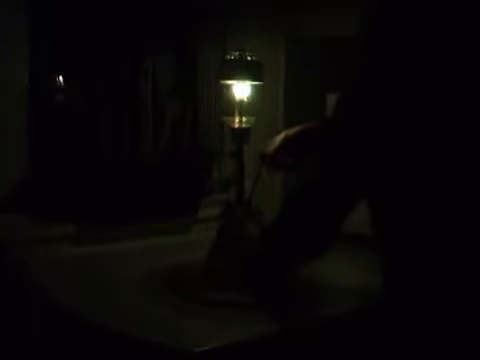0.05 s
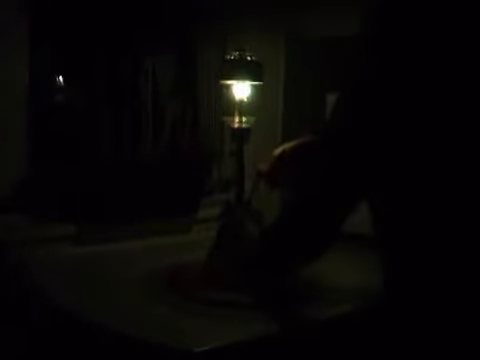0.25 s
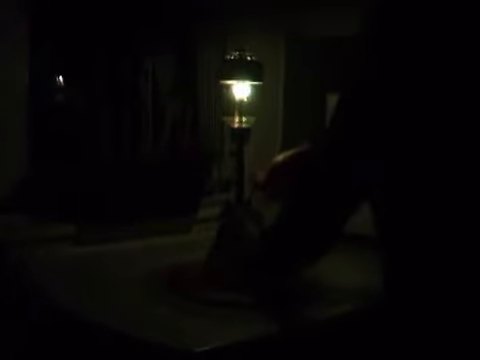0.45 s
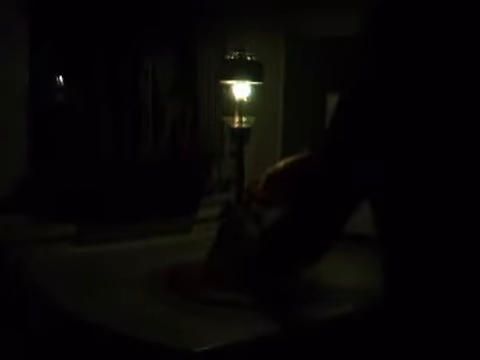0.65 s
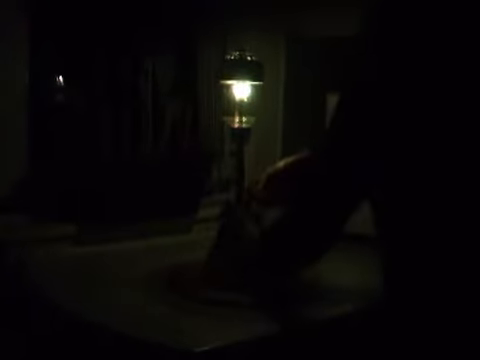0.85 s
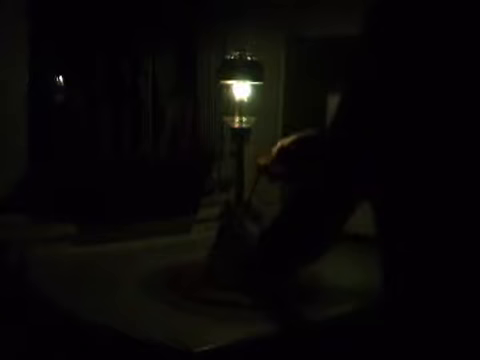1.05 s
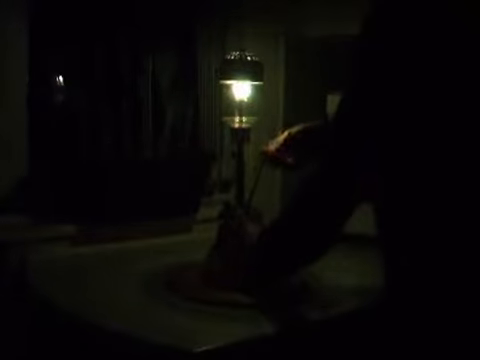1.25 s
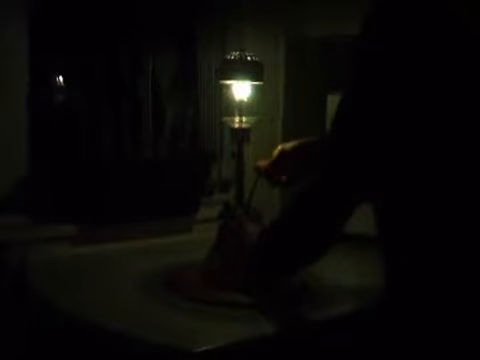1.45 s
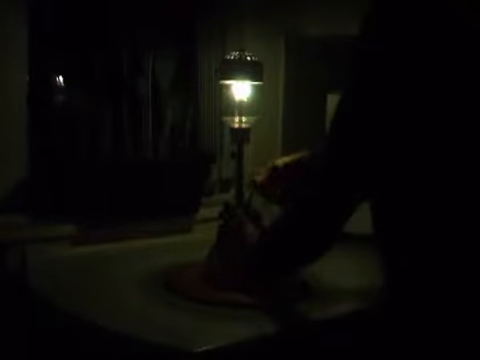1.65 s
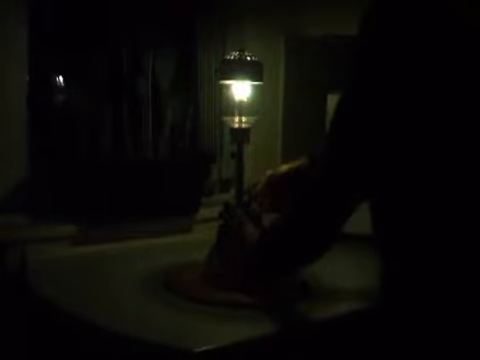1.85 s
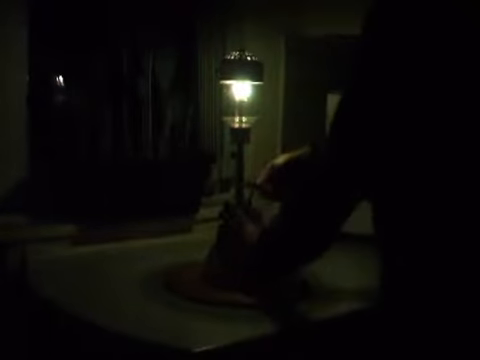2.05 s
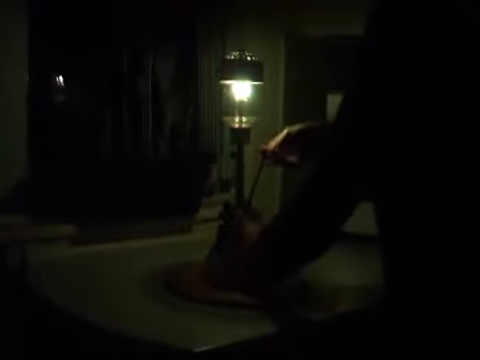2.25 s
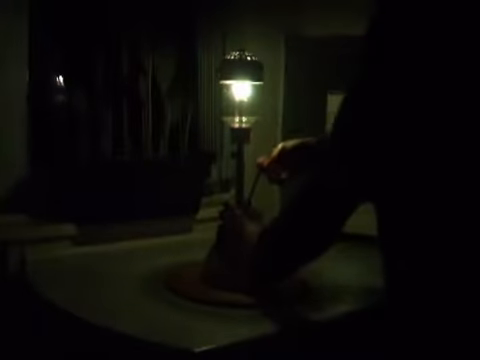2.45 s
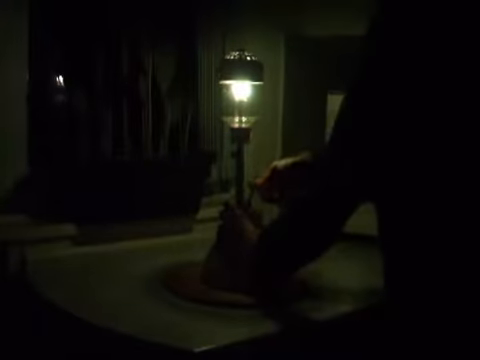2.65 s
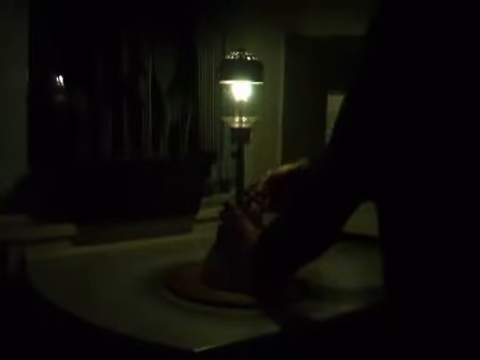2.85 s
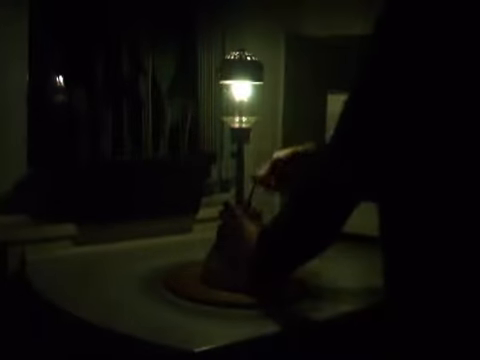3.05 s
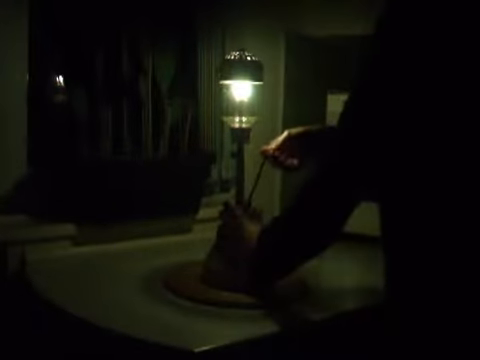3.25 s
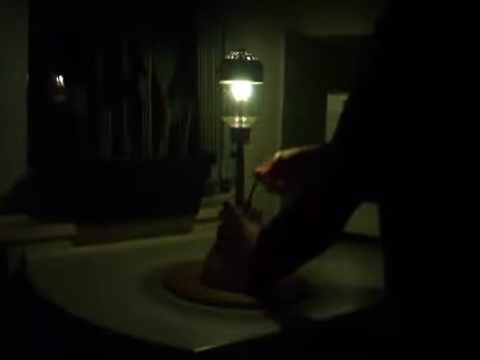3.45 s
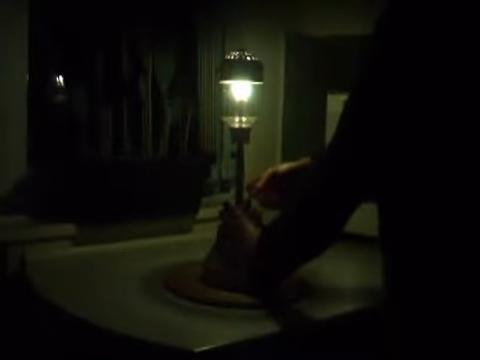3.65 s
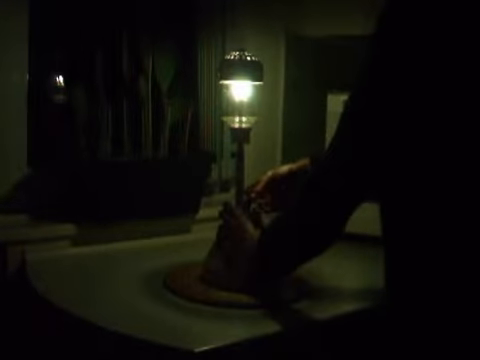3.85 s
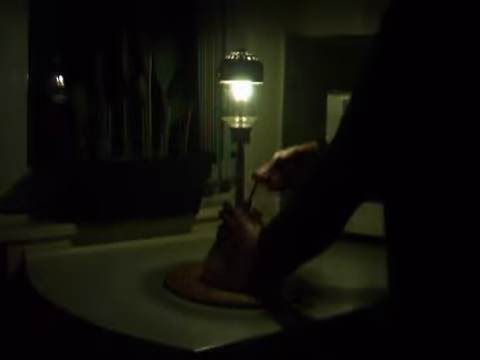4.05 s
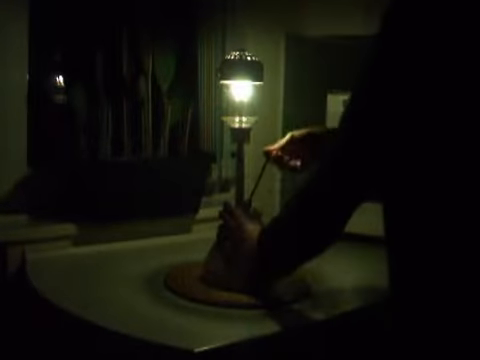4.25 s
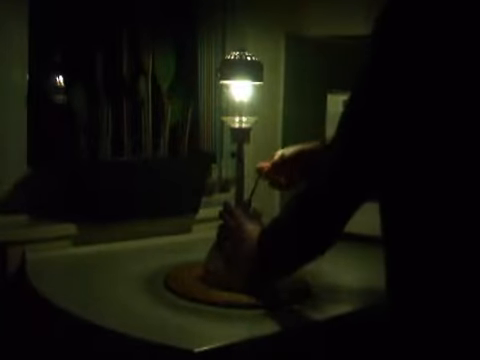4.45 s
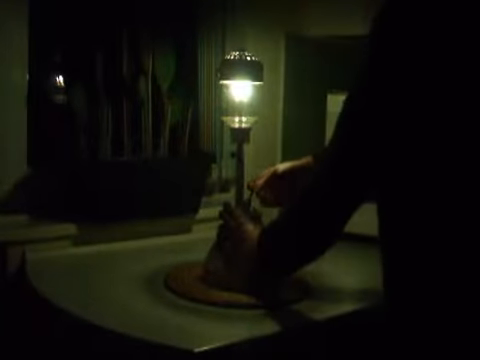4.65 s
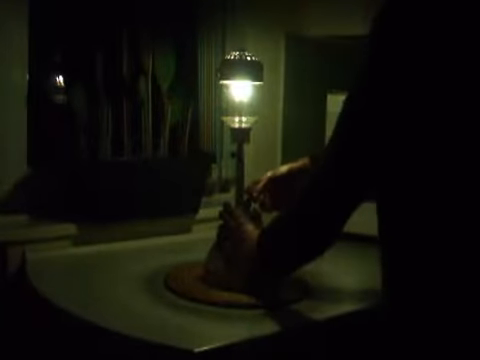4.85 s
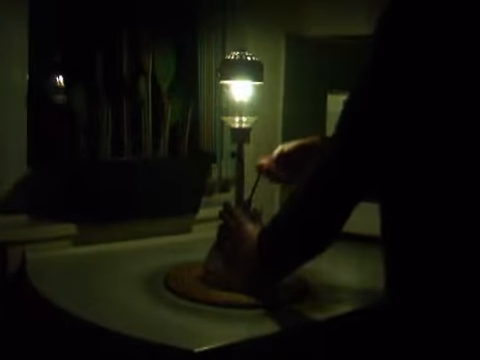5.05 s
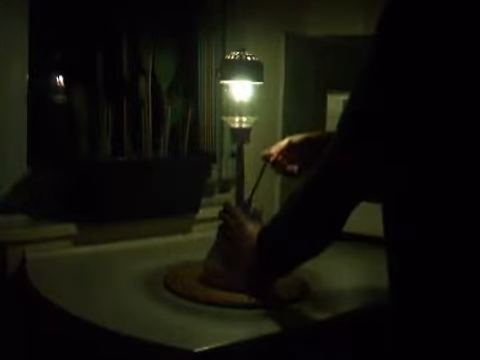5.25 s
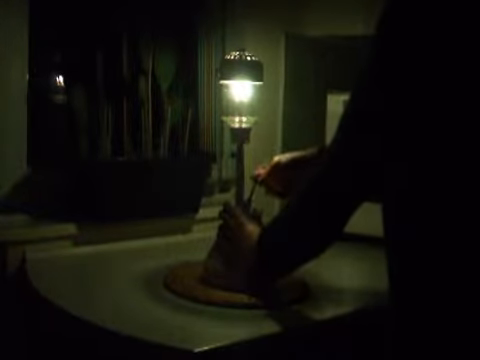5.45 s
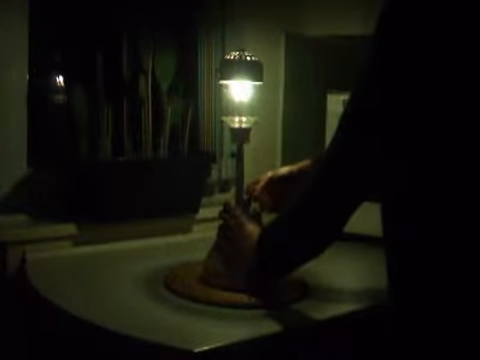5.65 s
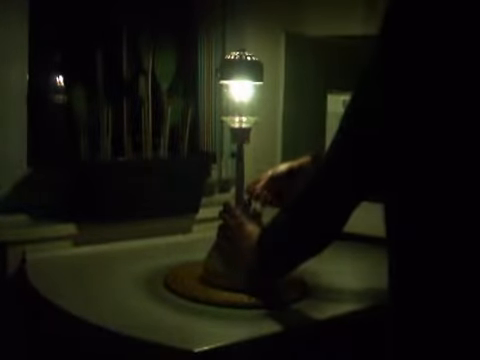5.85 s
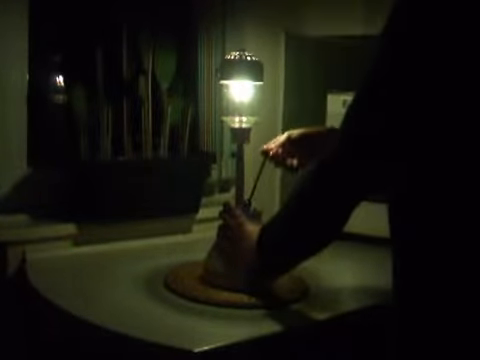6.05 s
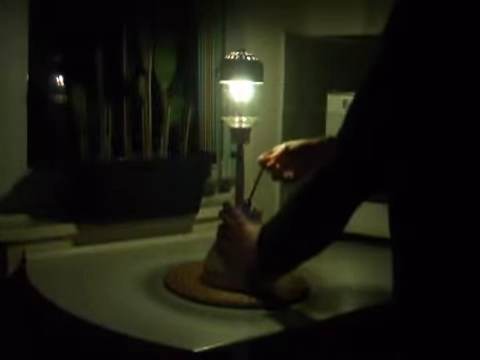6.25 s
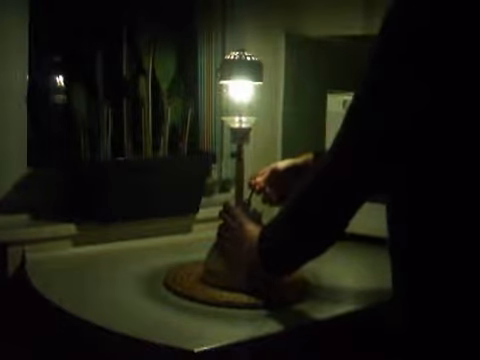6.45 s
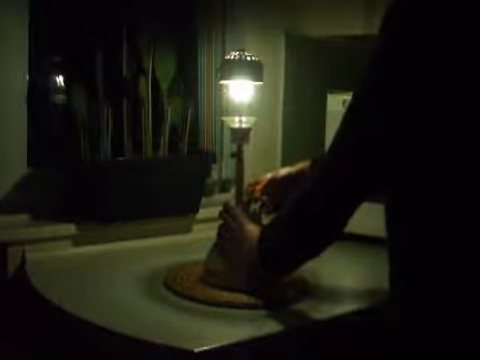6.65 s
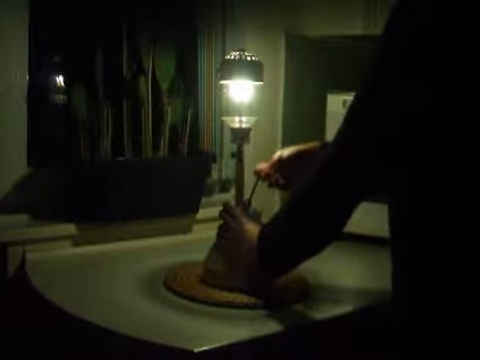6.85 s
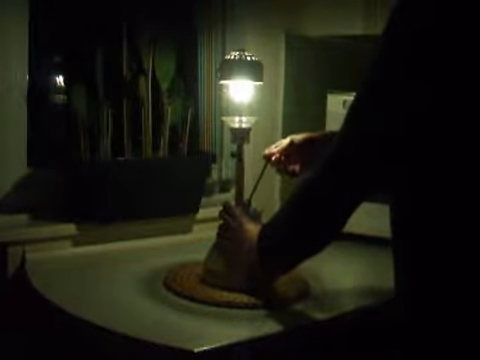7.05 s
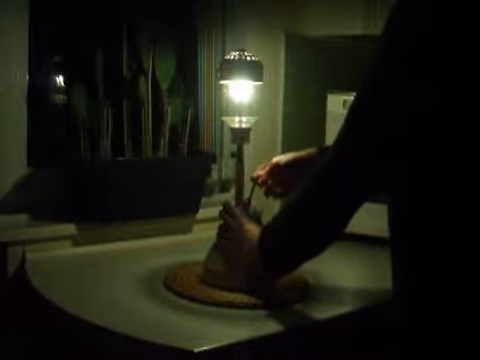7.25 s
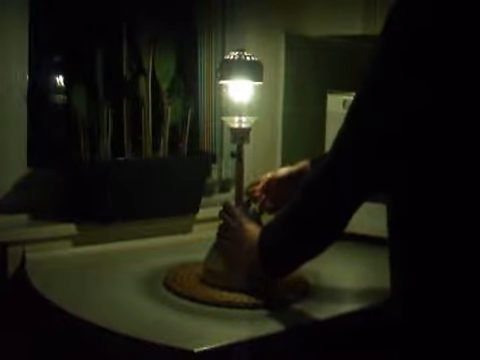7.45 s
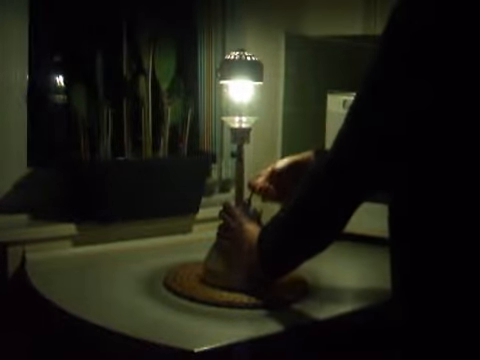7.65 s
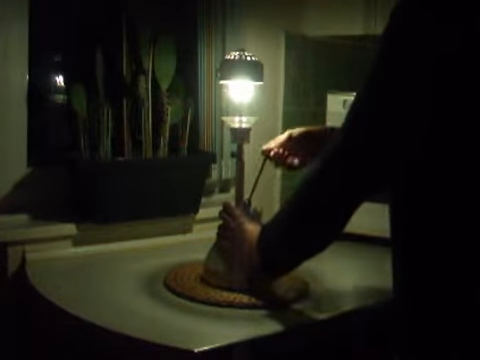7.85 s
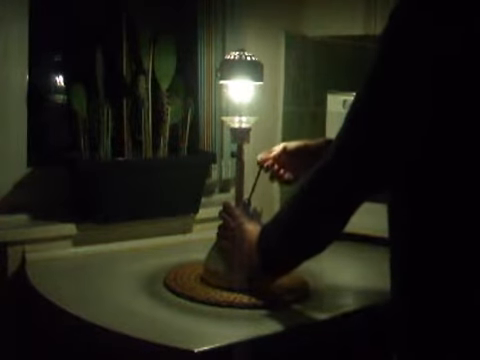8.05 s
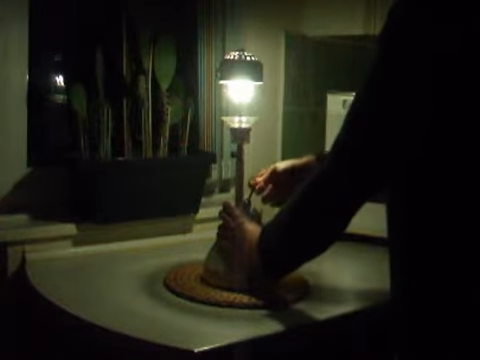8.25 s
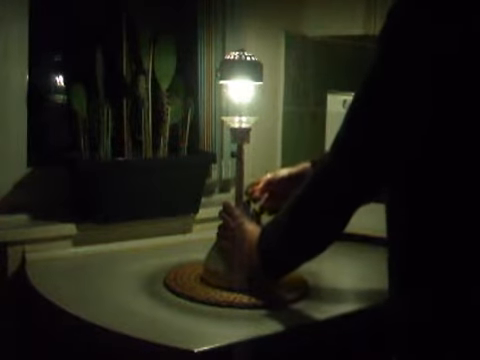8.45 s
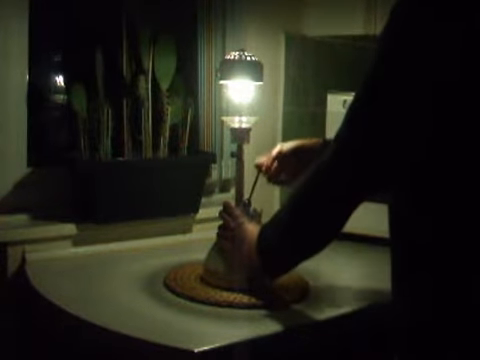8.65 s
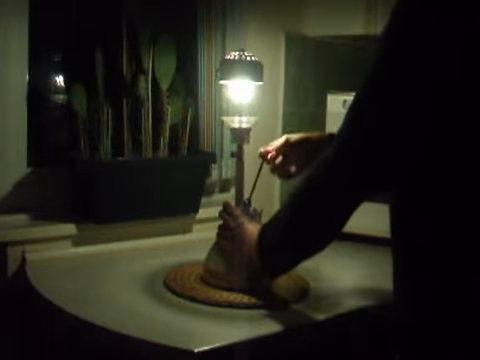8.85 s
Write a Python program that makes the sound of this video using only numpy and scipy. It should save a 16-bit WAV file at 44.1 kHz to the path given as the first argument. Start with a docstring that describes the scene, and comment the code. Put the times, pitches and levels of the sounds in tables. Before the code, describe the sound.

Steady quiet hissing and a soft low roar come from a burning lamp. Over it, someone pumps its tank by hand: light metallic clacks, double knocks and jingling ticks in irregular groups, some sharper and louder, with small gaps between. Faint hum and room rumble lie beneath. The sound is close to mid-distance, mono, slightly muffled on top, with brief reflections from hard kitchen walls.

```python
"""Metallic knocks and rattles: a pressure lamp is pumped by hand in a small hard kitchen, a few steps
from the microphone. At each contact the rod and its knob strike the tank; bursts of tiny impacts excite
decaying modes and noise bands of the metal, with a short room tail. Behind them the burner hisses, faintly
whistles and roars as shaped noise, over mains hum, house rumble and soft 61 Hz swells at irregular times."""
import sys
import numpy as np
from scipy import signal
from scipy.fft import rfft, irfft, next_fast_len
from scipy.io import wavfile
from scipy.ndimage import uniform_filter1d, map_coordinates

SR = 44100
rng = np.random.default_rng(int(sys.argv[2]) if len(sys.argv) > 2 else 0)


def persist_wave(psi):
    """Save psi, clipped to +-1, as 16-bit WAV."""
    counts = np.round(np.clip(psi, -1, 1) * 32767).astype(np.int16)
    wavfile.write(sys.argv[1], SR, np.atleast_2d(counts).T)


N = 392490  # samples, 8.9 s


def amp(db):
    """Gain of a level in dB."""
    return 10 ** (np.asarray(db) / 20)


def unit(x):
    """x scaled to rms 1."""
    return x / np.sqrt(np.mean(x ** 2) + 1e-20)


def along(points, hz):
    """Levels in dB between (Hz, dB) points on a log axis; -120 dB outside them."""
    point_hz, level_db = np.transpose(points)
    return np.interp(np.log(hz + 1), np.log(point_hz + 1), level_db, left=-120, right=-120)


def wobble(rate):
    """A smooth random curve through `rate` knots a second."""
    knots = rng.standard_normal(int(N * rate / SR) + 4)
    return map_coordinates(knots, [np.arange(N) * rate / SR])


def filtered(x, response):
    """x with its spectrum multiplied by a response of frequency."""
    size = next_fast_len(len(x) + 8192)
    spectrum = rfft(x, size) * response(np.fft.rfftfreq(size, 1 / SR))
    return irfft(spectrum, size)[:len(x)]


def rush(spectrum, patchy_db):
    """Turbulent noise of rms 1: its gain varies in random patches of time and frequency."""
    z = signal.stft(rng.standard_normal(N), nperseg=512)[2]
    field = uniform_filter1d(rng.standard_normal(z.shape), size=5, axis=0)  # smooth over frequency
    field = uniform_filter1d(field, size=10, axis=1)  # smooth over time
    noise = signal.istft(z * amp(patchy_db * unit(field)), nperseg=512)[1][:N]
    return unit(filtered(noise, lambda hz: amp(along(spectrum, hz))))


# Low rumble of the house, relative spectrum: pitch_hz, level_db
RUMBLE_SPECTRUM = [(15, -6.5), (30, -16.5), (42, -15.5), (54, 3.5), (62, -2), (70, -7.5), (80, -21.5)]


def house_rumble():
    """The house rumbles far below: low noise whose level drifts."""
    level_db = -63.5 + 1.6 * wobble(3)
    return amp(level_db) * rush(RUMBLE_SPECTRUM, patchy_db=-0.5)


# Mains hum lines: pitch_hz, level_db (rms, before a slight drift)
HUM_LINES = [(50, -57.5), (150, -76.5), (350, -68)]


def mains():
    """The mains hum as sine lines, slightly unsteady in level and phase."""
    t = np.arange(N) / SR
    hum = np.zeros(N)
    for hz, db in HUM_LINES:
        gain = amp(db + 0.69 * wobble(1.4)) * np.sqrt(2)
        hum += gain * np.sin(2 * np.pi * hz * t + 0.9 * wobble(2.5))
    return hum


# Soft low swells at irregular times: start_s, level_db (gain of the swell)
SWELLS = [(0.098, -45), (0.746, -48), (0.967, -43.5), (1.069, -57), (1.184, -42), (2.249, -44),
          (2.818, -40.5), (3.184, -41), (4.181, -42.5), (5.195, -44), (5.886, -44), (6.086, -44.5),
          (6.219, -44), (6.578, -44), (6.981, -42), (7.302, -40), (7.842, -42), (8.397, -42.5),
          (8.542, -45), (8.742, -40.5)]


def low_swells():
    """Soft low swells near the hum and rumble: a 61 Hz sine that rises and dies within each swell."""
    out, t = np.zeros(N + SR), np.arange(SR // 2) / SR
    envelope = t / 0.039 * np.exp(1 - t / 0.022)  # rises for 22 ms, then dies
    swell = envelope * np.sin(2 * np.pi * 61 * t)
    for start_s, level_db in SWELLS:
        out[round(start_s * SR):][:len(t)] += amp(level_db) * swell
    return out[:N]


WHISTLE_HZ, WHISTLE_HALF_WIDTH_HZ = 3800, 35  # gain halves this far from the centre
WHISTLE_DB, WHISTLE_RISE_DB_PER_S = -21, 0.74  # starting level against the hiss; it grows with the pressure


def jet_whistle():
    """A fuzzy tone in the jet: narrow-band noise that strengthens steadily and wavers."""
    t = np.arange(N) / SR
    tone = unit(filtered(rng.standard_normal(N),
                         lambda hz: 1 / (1 + ((hz - WHISTLE_HZ) / WHISTLE_HALF_WIDTH_HZ) ** 2)))
    return amp(WHISTLE_DB + WHISTLE_RISE_DB_PER_S * t + 2.5 * wobble(1.7)) * tone


# Burner level over time, before small flutter: time_s, hiss_level_db, roar_level_db
BURNER_LEVELS = [(0, -53, -56.5), (3.001, -52, -57), (5.199, -52, -57), (7.2, -51, -57), (8.9, -52, -57.5)]
# Jet hiss, relative spectrum: pitch_hz, level_db
HISS_SPECTRUM = [(530, -22.5), (900, -16), (1040, -35), (1130, 2.5), (1280, -4), (1670, -2), (2010, -2),
                 (2210, -3), (2400, -5.5), (2610, -4), (3790, -2), (5140, -4.5), (6790, -2.5), (8830, -11),
                 (14900, -120)]
# Flame roar, relative spectrum: pitch_hz, level_db
ROAR_SPECTRUM = [(44, -21), (75, -6.5), (92, -7.5), (141, -3), (221, -4.5), (350, -3), (414, -4),
                 (448, -4.5), (1100, -8), (1430, -47), (2420, -120)]


def burner():
    """The jet's turbulence hisses with a faint whistle; the flame roars softly lower down."""
    time_s, hiss_db, roar_db = np.transpose(BURNER_LEVELS)
    t = np.arange(N) / SR
    jet = rush(HISS_SPECTRUM, patchy_db=1.52) + jet_whistle()
    hiss = amp(np.interp(t, time_s, hiss_db) + 0.18 * wobble(22)) * jet
    roar_gain = amp(np.interp(t, time_s, roar_db) + 0.27 * wobble(8.4))
    return hiss + roar_gain * rush(ROAR_SPECTRUM, patchy_db=3.0)


# Decay of the small hard kitchen: pitch_hz, t60_s
KITCHEN_DECAY = [(100, 0.33), (600, 0.42), (2000, 0.5), (7000, 0.34)]


def kitchen(x, wet_db):
    """Direct sound and a fresh tail of the walls, each frequency dying at its own speed."""
    hz, t, z = signal.stft(rng.standard_normal(len(x)), SR, nperseg=256)
    point_hz, point_t60 = np.transpose(KITCHEN_DECAY)
    t60 = np.interp(hz, point_hz, point_t60)[:, None]
    tail = signal.istft(z * amp(-60 * t / t60), SR, nperseg=256)[1]
    tail = np.pad(tail / np.linalg.norm(tail), (SR // 300, 0))  # walls answer 3.3 ms later
    return x + amp(wet_db) * signal.fftconvolve(x, tail)[:len(x)]


def rattle(rise, length, count):
    """A contact is a short run of tiny impacts that swells, thins out and weakens (times in s)."""
    chance = rng.random((count, 3))
    s = np.minimum(-length * np.log(1 - chance[:, 0]), .15)
    size = amp(-10 * chance[:, 1] - 1.1 * s / length) * (1 - np.exp(-s / rise))
    train = np.zeros(SR // 5)
    np.add.at(train, (s * SR).astype(int), size * np.sign(chance[:, 2] - .5))
    return train


def puff(lo_hz, hi_hz, t60, t):
    """Noise in a band, dying away: the many modes too dense to tell apart."""
    band = signal.butter(3, [lo_hz, min(hi_hz, SR / 3)], "bandpass", fs=SR, output="sos")
    return signal.sosfilt(band, amp(-60 * t / t60) * rng.standard_normal(len(t)))


def ring(modes, t, scatter_db, slack=0, centre_hz=1000, focus_db=0):
    """A struck part: modes at new strengths and phases; slack shifts their pitch, focus favours the centre."""
    hz, db, t60 = np.transpose(modes)[:, :, None]
    strength, turn, shift = rng.standard_normal((3, len(modes), 1))
    octaves_away = np.abs(np.log2(hz / centre_hz))
    level = db + scatter_db * strength - focus_db * octaves_away
    phase = 2 * np.pi * hz * (1 + slack * shift) * t + np.pi * turn
    return (amp(level - 60 * t / t60) * np.sin(phase)).sum(axis=0) / np.linalg.norm(amp(level))


# Ringing modes of each part, level relative within the part: pitch_hz, level_db, t60_s
TANK_MODES = [(575.5, -3, 0.42), (626.5, 5, 0.18), (651.7, 5, 0.12), (668, 0, 0.14)]
BASE_MODES = [(825.6, 3.5, 0.31), (821, 3, 0.057)]
HOOD_MODES = [(1250, -15.5, 0.11), (1200.4, 0.5, 0.15), (1219, 0, 0.31), (1268, -6.5, 0.12)]
ROD_MODES = [(4700, -1.5, 0.079), (4630, -11.5, 0.035), (5080, -0.5, 0.11), (4910, 15, 0.025),
             (4730, -9.5, 0.059), (5070, -1.5, 0.22), (4850, -18, 0.22), (5520, -6, 0.17), (5150, -6, 0.16)]
LOW_FITTINGS = [(1450, -6, .05), (1681, 0, .08), (1965, 0, .06), (2140, -2, .05), (2280, 0, .05),
                (2400, -2, .05), (2500, 0, .05), (2650, 0, .05), (2796, -1, .06), (2950, 0, .05)]
MIDDLE_FITTINGS = [(3260, -3, .05), (3461, 0, .06), (3600, -3, .05), (3710, -2, .05), (3772, 0, .07),
                   (3920, -2, .05), (4043, 0, .06), (4274, 0, .06), (4450, -2, .05)]
HIGH_FITTINGS = [(5450, -4, .04), (5812, 0, .07), (6110, -3, .04), (6330, -2, .05), (6585, 0, .05),
                 (6780, -2, .04)]
ROD_HZ, ROD_SCATTER = 4864, .015  # leading pitch and its relative change from contact to contact
MIDDLE_HZ, MIDDLE_SCATTER = 3916, 0.061  # the same for the middle fittings


def lamp_parts(low_hz, t):
    """Responses of counter, tank, base, hood, rod and low, middle, high fittings: modes and dense noise."""
    rod_hz = ROD_HZ * (1 + ROD_SCATTER * rng.standard_normal())
    middle_hz = MIDDLE_HZ * (1 + MIDDLE_SCATTER * rng.standard_normal())
    push = puff(87, 500, 0.22, t)
    tank = ring(TANK_MODES, t, scatter_db=2.0) + 3 * puff(430, 760, .09, t)
    base = ring(BASE_MODES, t, scatter_db=4.0)
    hood = ring(HOOD_MODES, t, scatter_db=0.5) + 0.19 * puff(1000, 2000, 0.028, t)
    rod = ring(ROD_MODES, t, 4.4, 0.0031, rod_hz, focus_db=149)
    rod += 5 * puff(0.955 * rod_hz, 1.067 * rod_hz, .06, t)
    low = ring(LOW_FITTINGS, t, 3, 0.0083, low_hz, focus_db=16.0)
    low += 5 * puff(0.77 * low_hz, 1.21 * low_hz, .07, t)
    middle = ring(MIDDLE_FITTINGS, t, 0.95, 0.0063, middle_hz, focus_db=47)
    middle += 5 * puff(0.84 * middle_hz, 1.213 * middle_hz, 0.042, t)
    high = ring(HIGH_FITTINGS, t, 3.5, 0.006) + 4 * puff(5400, 9020, 0.12, t)
    return np.array([push, tank, base, hood, rod, low, middle, high])


def touching(parts, t):
    """Touching parts damp one another unevenly: each level wavers at random, 40 knots per contact."""
    knots = rng.standard_normal((len(parts), 40))
    chatter = [np.interp(t, np.linspace(0, t[-1], num=40), row) for row in knots]
    return parts * amp(2.8 * np.array(chatter))


# Contacts of the pump; levels are rms over the first 1/16 s, low_pitch_hz leads the low fittings:
# time_s, tank_level_db, hood_level_db, rod_level_db, low_level_db, low_pitch_hz, high_level_db
PUMP_CONTACTS = [(0.033, -59, -45, -70, -70.5, 1970, -68), (0.308, -46.5, -48, -64, -41, 2430, -48),
                 (0.676, -52, -55, -60, -49.5, 2020, -55), (0.717, -67, -53, -48.5, -53, 2280, -64),
                 (0.837, -51, -37.5, -43, -47.5, 2330, -43.5), (0.859, -52.5, -49.5, -51.5, -51, 2780, -49),
                 (0.911, -56.5, -49, -56, -61.5, 1670, -61), (1.286, -59, -43.5, -54, -50.5, 2620, -52),
                 (1.346, -72, -53, -70, -62, 2740, -68), (1.463, -53.5, -53.5, -65, -59.0, 2460, -73),
                 (1.816, -45, -44.5, -41, -40, 1890, -43.5), (1.841, -45.5, -47, -37.5, -44, 1880, -46),
                 (1.972, -58, -40, -68, -50.5, 2620, -58.5), (1.999, -50.5, -53, -60, -50.0, 2680, -52.5),
                 (2.039, -59, -66, -73, -64.0, 2690, -64), (2.302, -58, -44.5, -56, -46, 2530, -47),
                 (2.499, -54.5, -54.5, -67, -56, 2250, -70.5), (2.592, -53, -55.5, -51.5, -54.5, 2160, -77),
                 (2.647, -66, -58.5, -47, -65, 2080, -64.5), (2.77, -45, -46, -40, -40, 1710, -42.5),
                 (2.799, -42.5, -48.5, -38.5, -43.5, 2640, -57), (2.926, -46, -39, -57, -42.5, 2170, -38.5),
                 (2.968, -51, -62, -56.5, -49.5, 2800, -46.5), (3.27, -57, -45, -59, -44, 2480, -46),
                 (3.479, -54, -50.0, -54, -43.5, 2440, -58.5), (3.739, -52, -52.5, -47.5, -45, 2010, -47.5),
                 (3.842, -55, -38.5, -54, -44.0, 2900, -49), (3.897, -54.5, -45.5, -62, -51, 2790, -58),
                 (3.929, -34, -42, -46, -38.5, 2670, -34.5), (3.969, -51, -71, -52, -44, 2900, -69),
                 (4.095, -69, -63, -56.5, -65, 2720, -69), (4.564, -51.5, -49, -67, -49.5, 2390, -60),
                 (4.749, -52.5, -48.5, -70, -53, 1650, -63), (4.895, -52, -48.5, -70, -56.0, 1920, -57),
                 (5.138, -70.5, -53.5, -72, -60, 2940, -62), (5.438, -56.5, -54.0, -62, -48, 2600, -64),
                 (5.678, -48, -45.5, -39, -39.5, 1970, -48), (5.706, -46.5, -44, -30, -44, 2320, -38),
                 (5.724, -64, -72, -41, -66, 1750, -58), (5.821, -52, -40.5, -62, -50.5, 1890, -48),
                 (5.873, -41.5, -48.5, -46.5, -54, 2280, -44.5),
                 (6.373, -53.5, -49.5, -60, -43, 2480, -51.5),
                 (6.562, -47.5, -42.5, -40.5, -39.5, 2340, -43),
                 (6.598, -45.5, -53.5, -44, -45, 1920, -41.5), (6.701, -52, -43.5, -54, -52.5, 2940, -59),
                 (6.762, -45.5, -47.5, -53, -47.5, 2600, -44), (7.115, -72, -50.0, -70.5, -67, 2810, -54),
                 (7.241, -53.5, -47, -50, -41, 2410, -44), (7.319, -53, -50.5, -51, -54, 1900, -57.5),
                 (7.443, -47.5, -44.5, -44, -42.5, 1930, -45.5), (7.469, -64, -40.5, -41, -45, 2350, -45.5),
                 (7.488, -67, -46, -44.5, -66, 2470, -58), (7.589, -53.5, -39, -58, -46, 2840, -47.5),
                 (7.636, -42, -39.5, -46, -41, 3020, -36.5), (7.709, -68.5, -60, -70, -55, 2670, -64),
                 (8.364, -45.5, -44, -38.5, -40, 1850, -44), (8.39, -50, -44, -34.5, -48, 2140, -51.5),
                 (8.414, -65, -72, -45, -59, 1720, -54), (8.516, -54.5, -37, -56, -47.5, 2800, -46.5),
                 (8.545, -38.5, -73, -44, -49, 2430, -35), (8.584, -47, -49, -71, -58, 1700, -68),
                 (8.616, -76, -42.5, -54, -51.5, 2770, -72)]
BASE_DB, MIDDLE_DB = -9.5, 1  # base against mean of tank and hood; middle against mean of low and high
USUAL_DB = -50  # reference for the mean of tank and rod
COUNTER_DB, COUNTER_GROWS = -56.5, 0.57  # counter push at that reference; dB per dB of the mean


def pump():
    """Each contact rattles tank, base, hood, rod and loose fittings, and pushes the counter."""
    out, t = np.zeros(N + SR), np.arange(SR * 2 // 5) / SR
    for time_s, tank_db, hood_db, rod_db, low_db, low_hz, high_db in PUMP_CONTACTS:
        parts = lamp_parts(low_hz, t)
        impacts = np.pad(rattle(rise=0.0021, length=.008, count=22), (0, SR // 5))
        blows = kitchen(impacts, wet_db=-3.5)
        parts = signal.fftconvolve(parts, blows[None], axes=1)[:, :len(t)]
        parts = touching(parts, t)
        parts /= np.sqrt(np.mean(parts[:, :SR // 16] ** 2, axis=1, keepdims=True))  # rms 1 at first
        counter_db = COUNTER_DB + COUNTER_GROWS * ((tank_db + rod_db) / 2 - USUAL_DB)
        base_db = (tank_db + hood_db) / 2 + BASE_DB
        middle_db = (low_db + high_db) / 2 + MIDDLE_DB
        levels = [counter_db, tank_db, base_db, hood_db, rod_db, low_db, middle_db, high_db]
        start = round((time_s - .004) * SR)  # the run of impacts begins 4 ms early
        out[start:][:len(t)] += amp(levels) @ parts
    return out[:N]


def scene():
    """All sources, from background to pump, at the one microphone."""
    return (house_rumble() + mains() + low_swells() + burner() + pump())[None]


TOP_HZ = 6989  # the treble falls from here at 0.4 dB per Hz, down to -100 dB
OFFSET = -.0024  # constant shift of the waveform, full scale 1


def record(dry):
    """The microphone's channel cuts the treble above its band limit and sits a little off zero."""
    return filtered(dry[0], lambda hz: amp(-.4 * np.clip(hz - TOP_HZ, 0, 250)))[None] + OFFSET


dry = scene()
out = record(dry)
persist_wave(out)
```